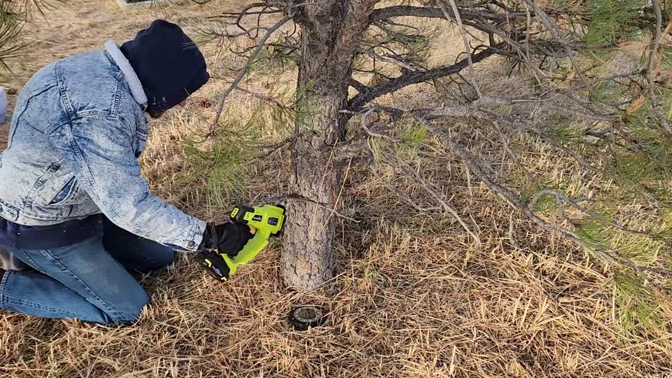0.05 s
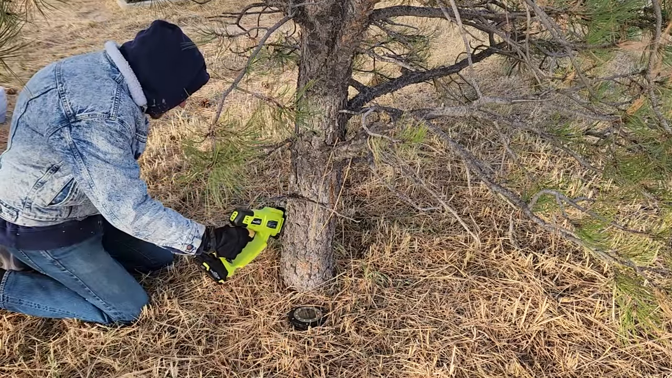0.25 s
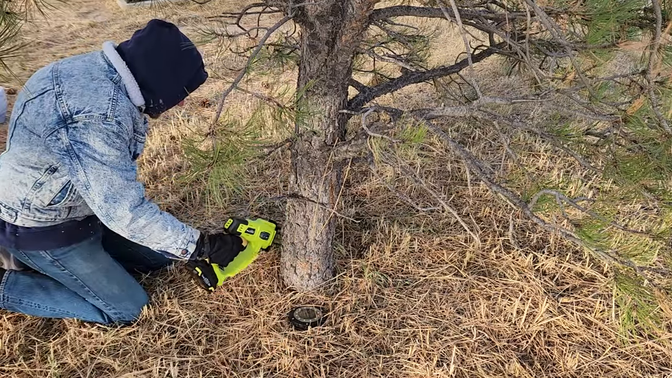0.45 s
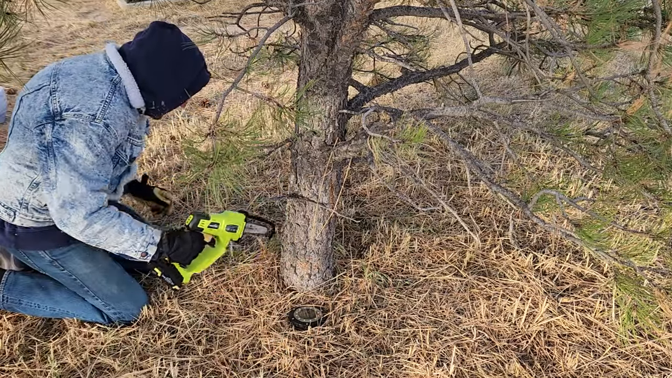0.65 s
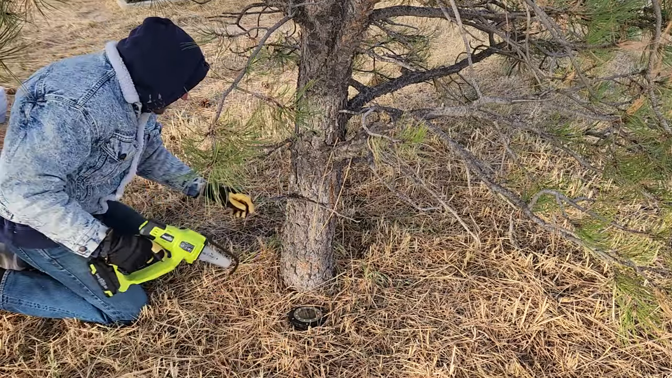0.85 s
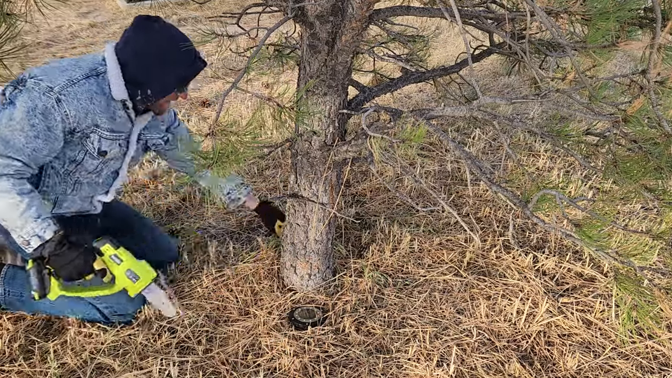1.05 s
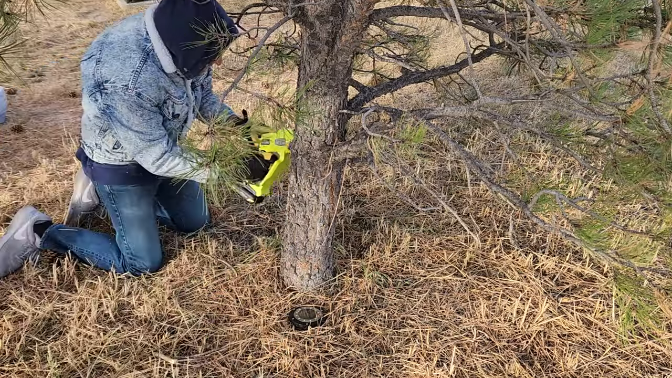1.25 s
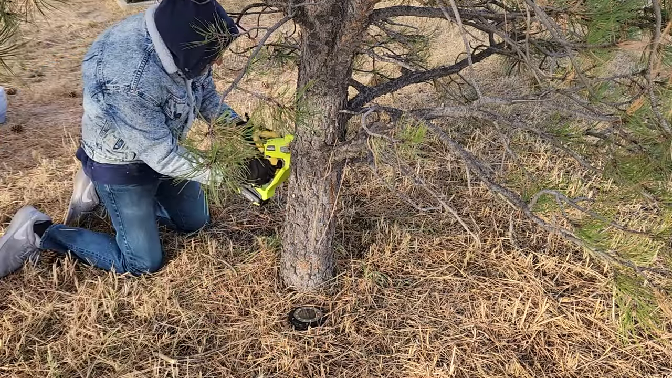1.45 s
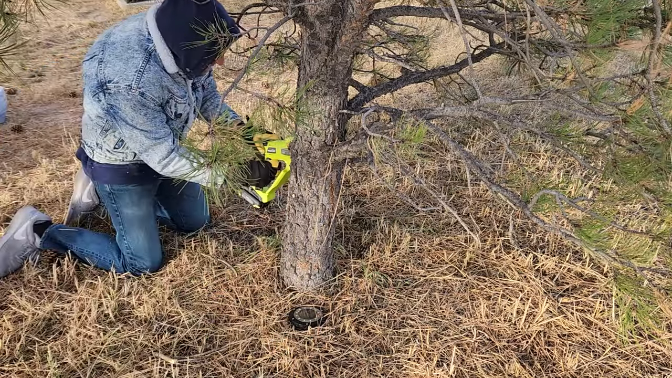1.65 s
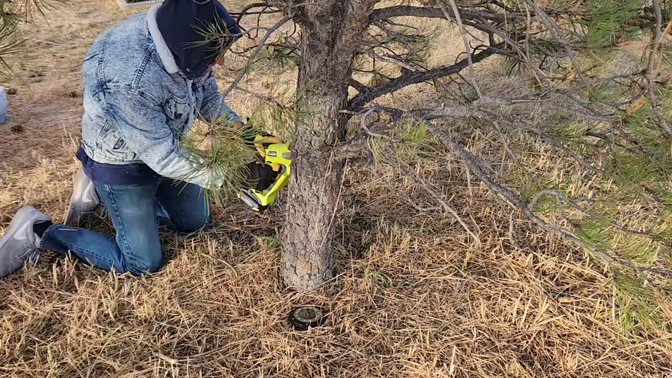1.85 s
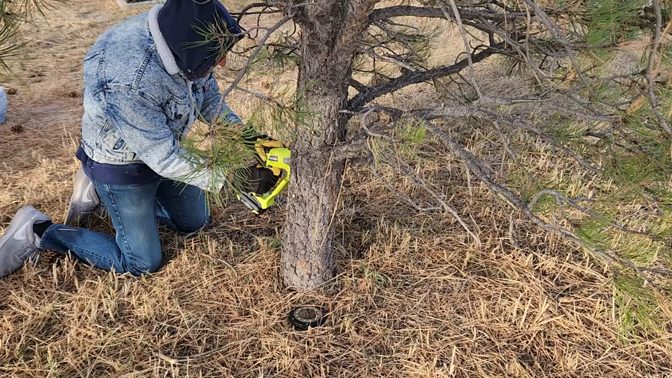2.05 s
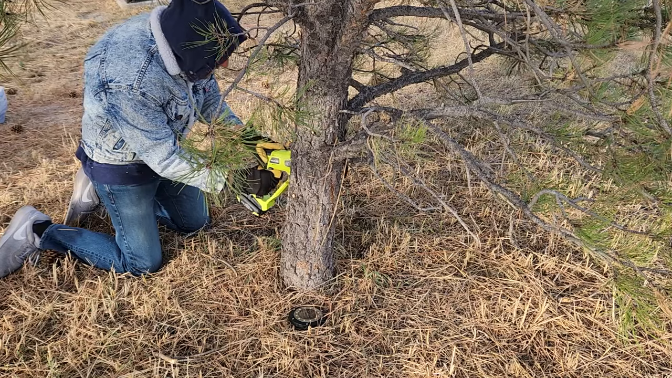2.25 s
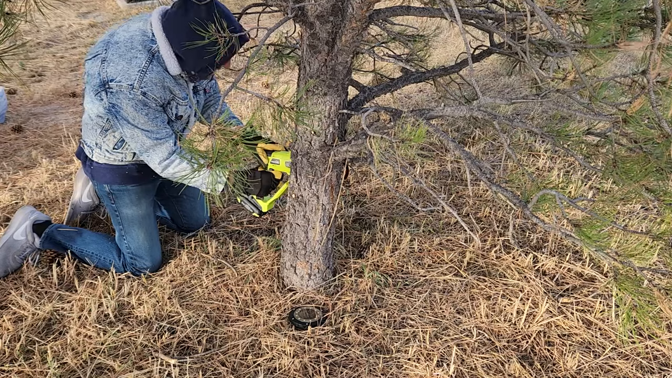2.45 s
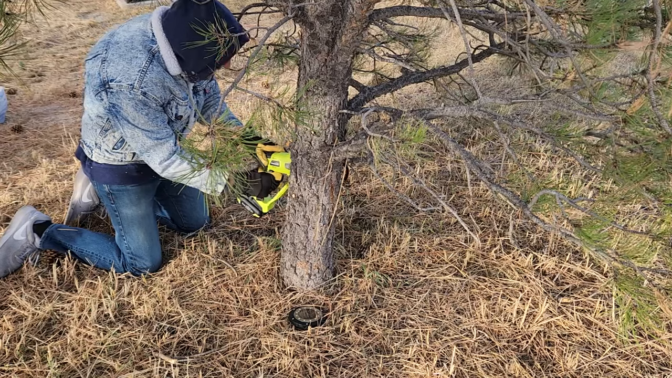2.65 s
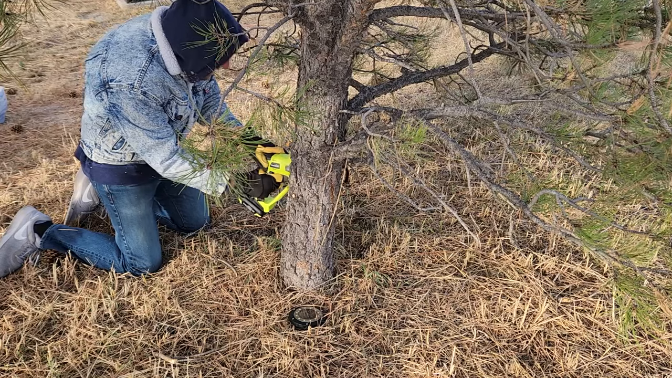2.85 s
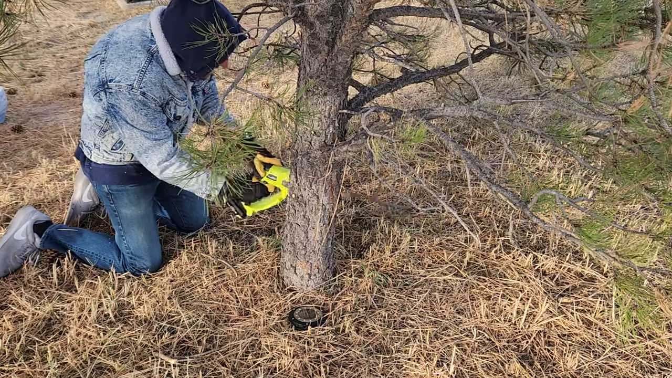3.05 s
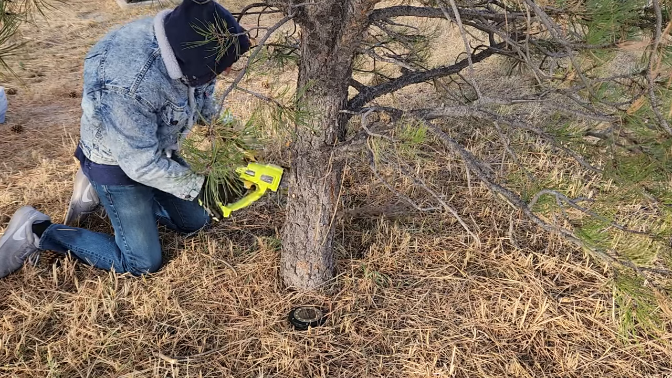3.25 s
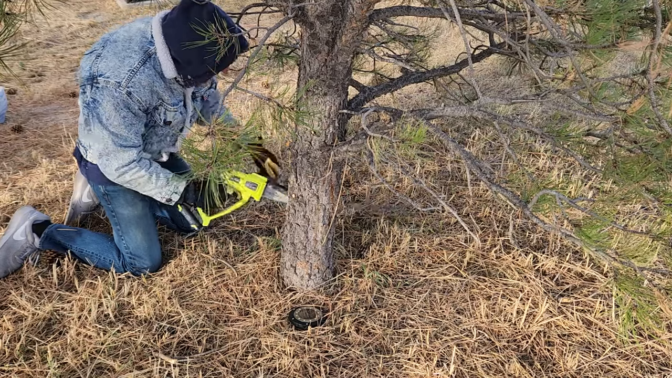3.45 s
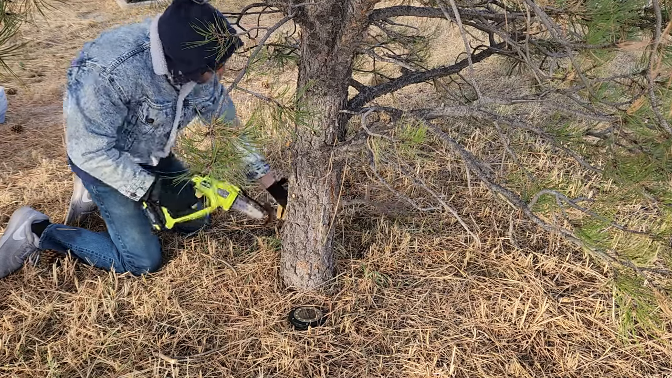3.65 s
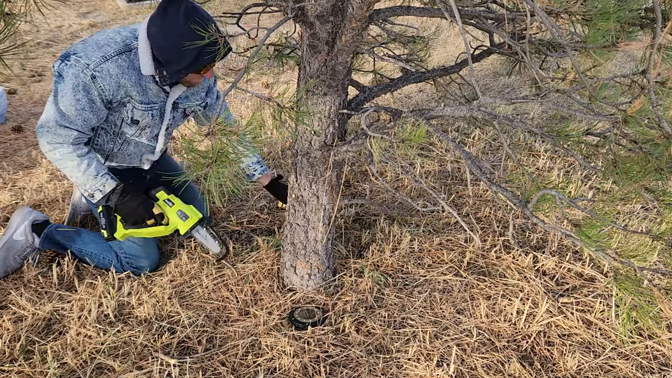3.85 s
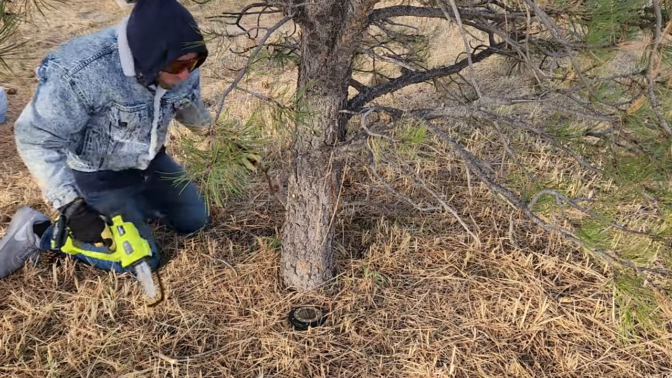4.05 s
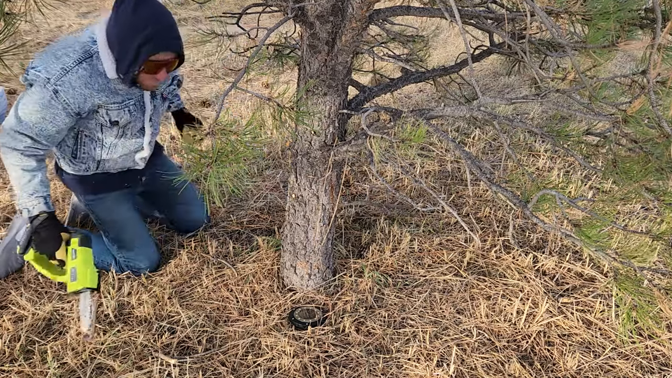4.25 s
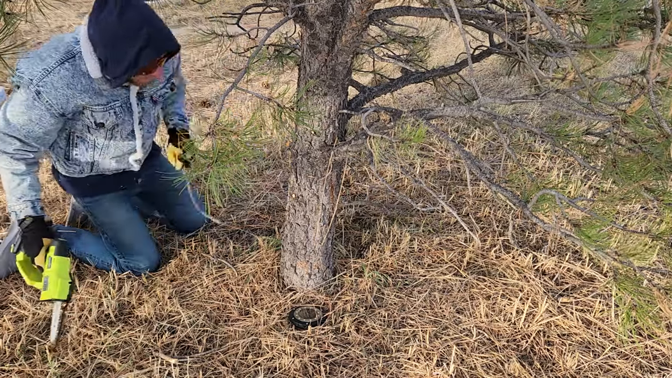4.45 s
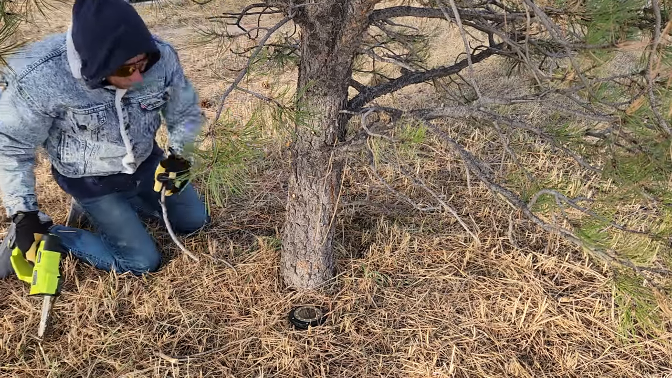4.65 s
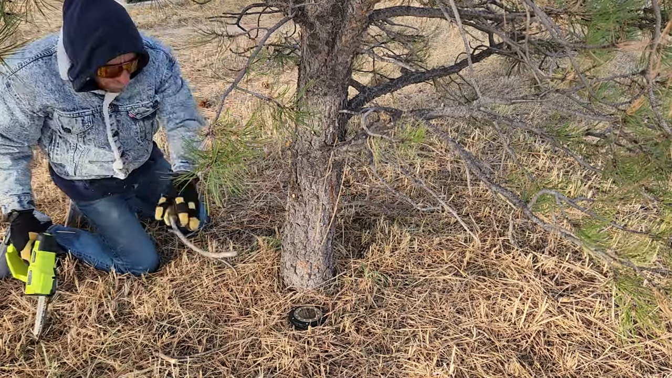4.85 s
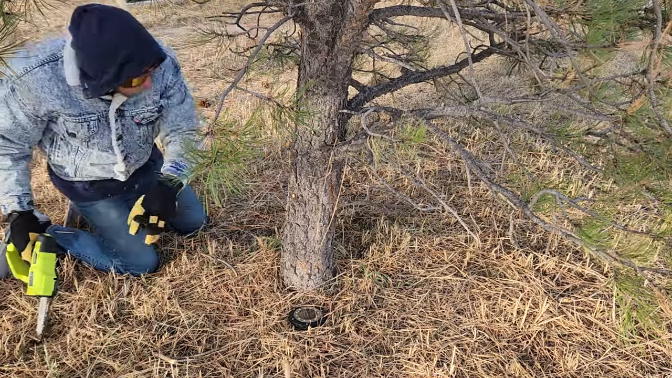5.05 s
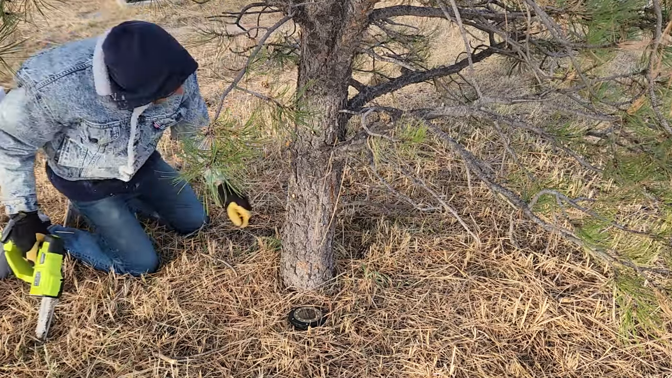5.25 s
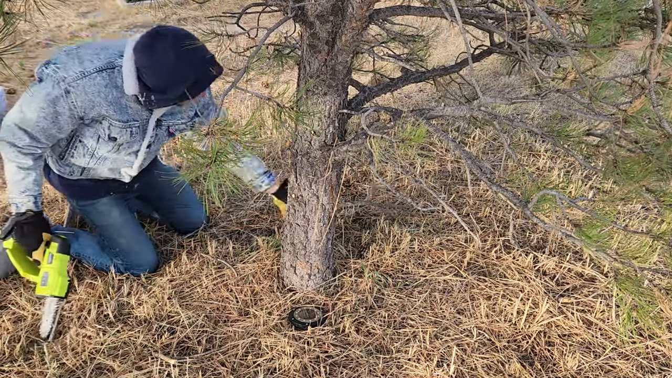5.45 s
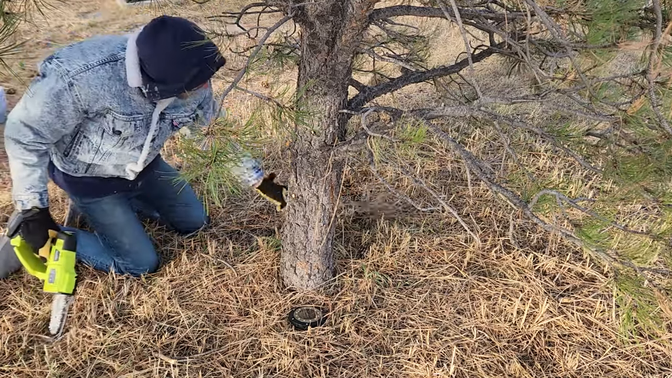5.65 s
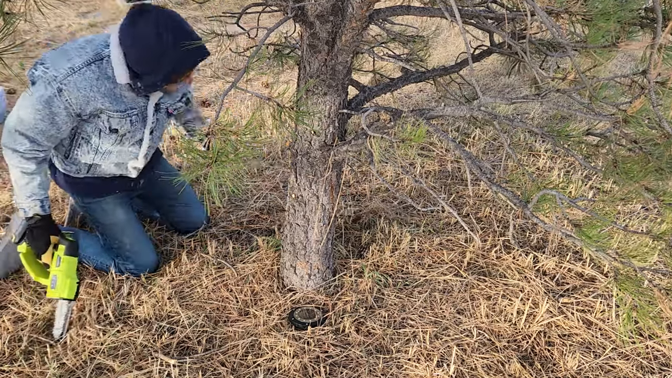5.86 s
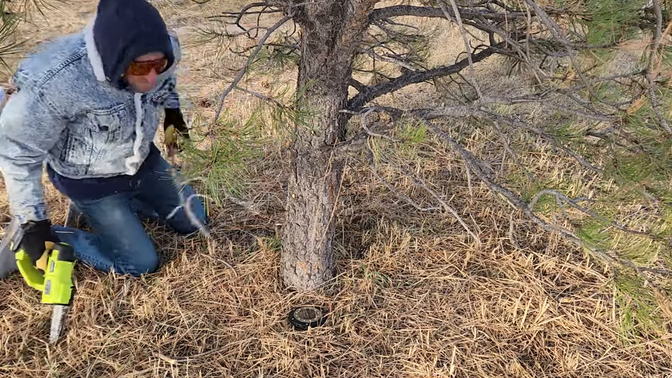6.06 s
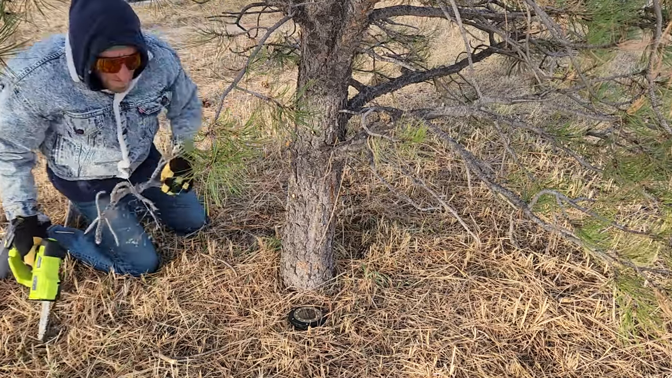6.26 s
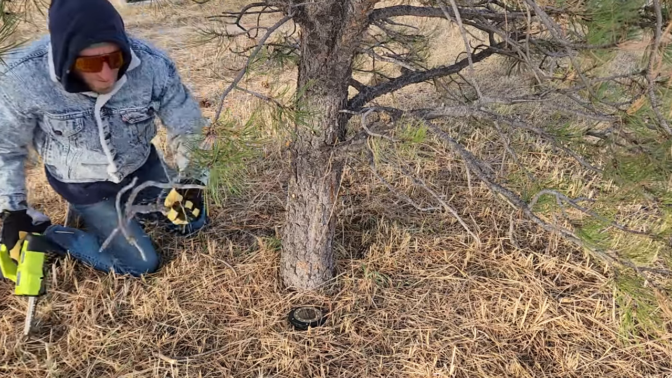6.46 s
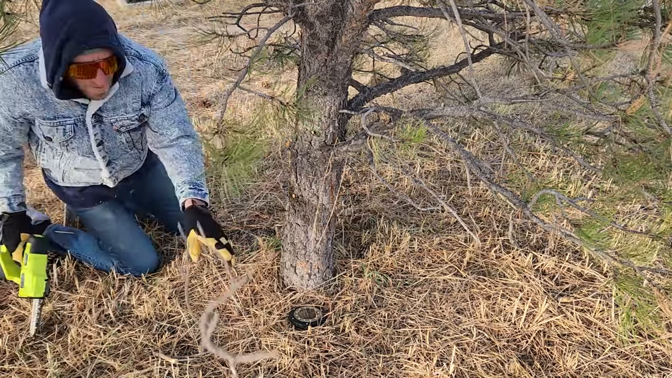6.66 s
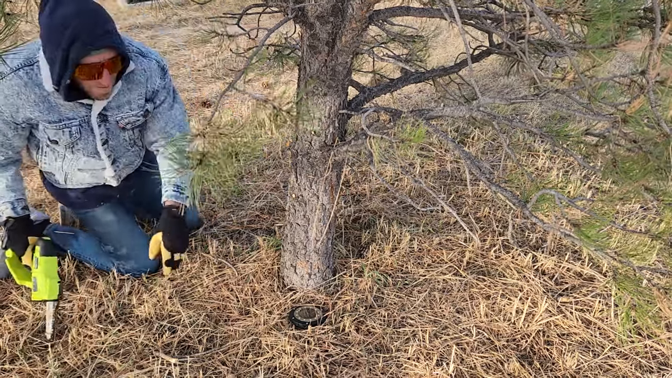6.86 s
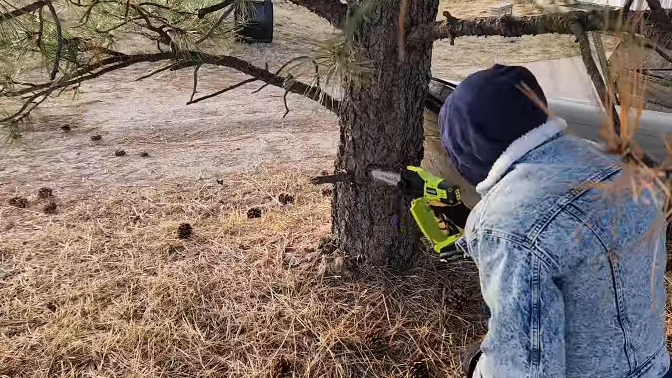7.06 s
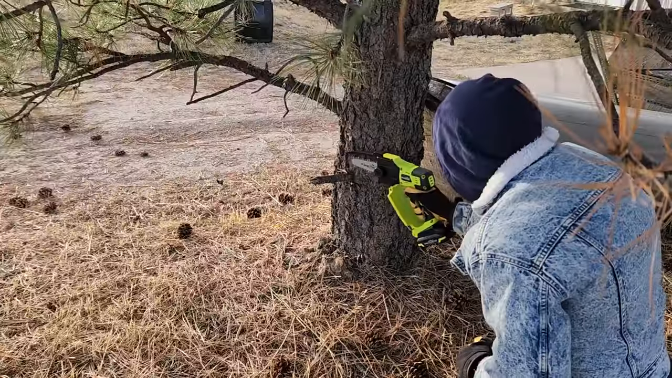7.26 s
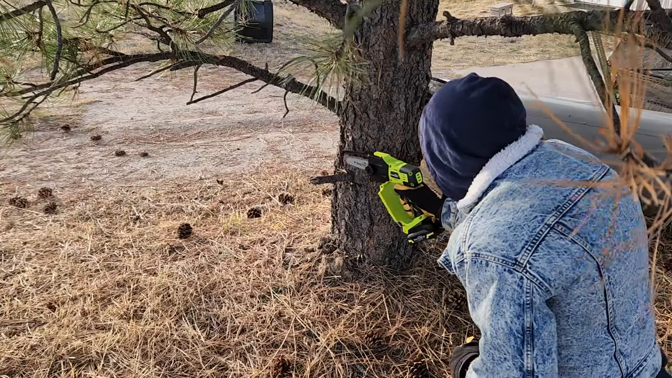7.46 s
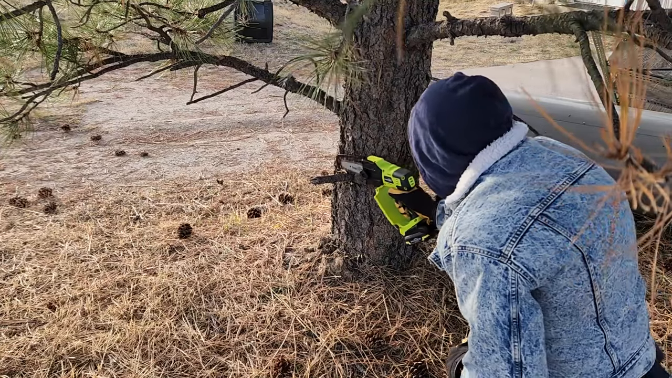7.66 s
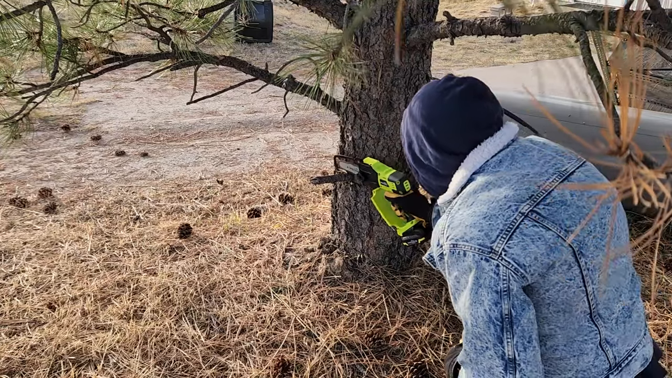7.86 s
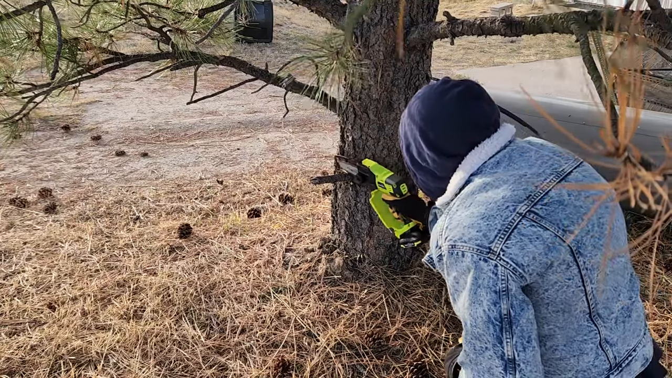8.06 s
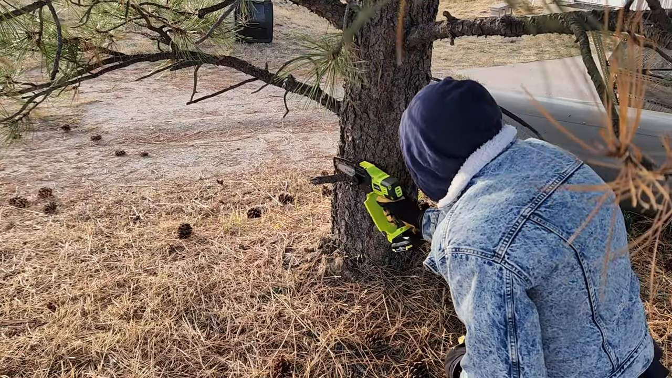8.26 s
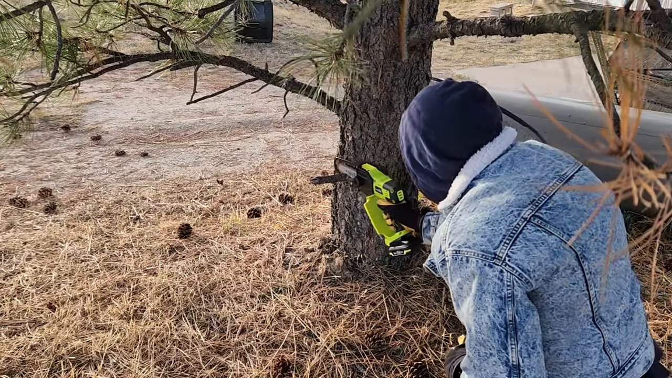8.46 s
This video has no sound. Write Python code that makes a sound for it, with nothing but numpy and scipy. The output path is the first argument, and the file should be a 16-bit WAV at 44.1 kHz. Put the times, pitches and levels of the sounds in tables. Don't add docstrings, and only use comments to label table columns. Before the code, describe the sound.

A small electric chainsaw buzzes through a thin branch, coasts down, cuts a thicker one, then after quiet rustling and twig snaps restarts closer.

```python
import sys
import numpy as np
from scipy import signal
from scipy.fft import rfft, irfft
from scipy.io import wavfile
from scipy.ndimage import uniform_filter1d

SR = 44100
rng = np.random.default_rng(int(sys.argv[2]) if len(sys.argv) > 2 else 0)


def waveform_to_disk(signal):
    frames = np.transpose(np.atleast_2d(signal))
    scaled = np.clip(frames, -1, 1) * 32767
    samples = np.round(scaled).astype(np.int16)
    wavfile.write(sys.argv[1], SR, samples)


def convert_level_to_amplitude(level_db):
    exponent = np.asarray(level_db, float) / 20
    return 10 ** exponent


N = 375290
TIME = np.arange(N) / SR
PADDED = N + 510
FREQS = np.fft.rfftfreq(PADDED, 1 / SR)

# likeness [f/Hz, 0-1], balance [f/Hz, level/dB], lead of the left [t/s]
PORTS_FAR = ([(60, .97), (400, .95), (1400, .88), (2500, .65), (5000, .6), (9000, .55), (15000, .5)],
              [(60, 0.0), (150, 0.0), (380, 1.0), (950, 3.5), (2380, 3.5), (5980, 5.5), (15000, 3.5)],
              9.5e-5)
PORTS_NEAR = ([(60, .9), (400, .92), (2500, 0.89), (5000, 0.7), (9000, 0.41), (15000, 0.35)], [(60, -5),
               (150, 6.5), (380, -1.5), (950, 3.5), (2380, 3), (5980, 5.5), (15000, 2)], 1.5e-5)
PORTS_AIR = ([(60, 1), (180, 0.98), (550, 0.32), (1650, 0.14), (4970, 0.094), (15000, 0.1)], [(60, 1.0),
              (240, 0.5), (950, 2.1), (3770, 5.3), (15000, 5.5)], 5e-5)
# [t/s, chips torn out level/dB, sag of the motor f/Hz]
CUTS = [
    [(0.0, -29, 34.03), (.1, -30, 34), (.15, -28, 34), (.27, -27.5, 34.3), (.285, -36.5, 34.2),
     (.3, -28, 33.7), (.345, -31, 34.15), (0.385, -29, 33.9)],
    [(2.3, -47, 5.9), (2.55, -35, 14.2), (2.66, -32, 55), (2.912, -30, 55), (2.945, -34.5, 54)],
    [(8.125, -54, 4.75), (8.141, -29.5, 19.6), (8.25, -25.5, 33.4), (8.43, -25.5, 28), (8.442, -35.5, 28),
     (8.46, -27.5, 27), (8.51, -27.5, 30)],
]
# [f/Hz, level/dB per Hz]
HISS_FAR = [(2350, -30.5), (4000, 1), (4960, 1.5), (5540, 1), (6000, -2.5), (7270, 1.5), (8550, -4.5),
            (9770, -7), (10800, -5), (12800, -2), (13800, -6.5), (15100, -7)]
WOOD = [(120, -50.5), (200, -13), (458, -13.5), (787, 1), (999, -7), (1920, -1), (2560, -7), (4060, -1),
        (7430, -14), (9000, -41.5), (11700, -50), (19800, -120)]
WOOD_NEAR = [(88, -34.5), (150, -8.5), (301, -13), (382, -10.5), (551, -12), (615, -9), (1090, -4),
             (1460, -14), (2180, -8.5), (3920, -8), (8020, -14.5), (8950, -15.5), (12000, -8.5),
             (15600, -41), (22000, -120)]
SNAP = [(180, -43), (300, -10), (1750, -5.5), (2250, -7), (2440, -3.5), (4300, -6), (6100, -5.5),
        (6740, -17), (7440, -9), (9240, -25), (12700, -18.5)]
BRIGHT_RUB = [(710, -47), (1200, -17), (1960, -13), (2260, -16), (2480, -7), (2770, -11), (3390, -6),
              (7170, -0.5), (15500, -6.5)]


def chainsaw():
    # [pulled t/s, let go t/s, free-running turns f/Hz, driven orders level/dB, gear mesh level/dB]
    trigger = [
        (-1, .51, 353, -48, -43.5),
        (1.5, 3.105, 354.5, -47, -64),
        (7.415, 9, 356.8, -52, -46),
    ]
    # [t/s, hiss level/dB, housing rattle over hiss level/dB]
    burst_1 = [
        (0.0, -35, 3),
        (0.37, -33, 3.5),
        (0.424, -38, 3),
        (0.67, -35.5, -2.5),
        (1.06, -43, 6.5),
        (1.165, -49.5, 10.5),
        (1.193, -53, 10),
    ]
    burst_2 = [
        (1.51, -60.5, 3),
        (1.52, -50, 15),
        (1.58, -41.5, 3.5),
        (2.19, -42, 3.8),
        (2.89, -35.5, 2.25),
        (2.97, -40.5, 0.98),
        (3.57, -43, 4.7),
        (3.95, -55.5, 15.8),
        (4.07, -78, 24),
    ]
    burst_3 = [
        (7.425, -42.5, 7.5),
        (7.515, -32.5, -3),
        (8.101, -32, -3.5),
        (8.169, -27.5, -2.5),
        (8.459, -30, -1),
        (8.51, -25, -2),
    ]
    # [multiple of the turns, level/dB]
    orders_far = [(1, -21), (1.75, -16.5), (2, -17), (3, -7.5), (4, -4.5), (5, -10.5), (6, -16.5),
                  (7, -14.5), (36, -16.5)]
    orders_near = [(1, -8.5), (2, -9), (3, -10.5), (4, -5.5), (5, -8), (7, -10), (13, -2), (36, -8.5)]
    # [f/Hz, level/dB per Hz]
    rattle_far = [(180, -62), (300, -13), (353, -16), (521, -17.5), (607, -11), (877, -10.5), (1050, -4.5),
                  (1210, -4.5), (1440, -2), (1570, -6.5), (4000, -7.5), (5200, -40.5), (8800, -120)]
    rattle_near = [(180, -70), (300, -33), (353, -14), (434, -19.5), (669, -12), (699, -6), (813, -14),
                   (1440, -5), (1700, -9.5), (2110, -0.5), (4000, -7.5), (5200, -40), (8800, -120)]
    hiss_near = [(2350, -38.5), (4000, -10), (4570, 2), (4900, -3.5), (5760, -4.5), (6400, -5),
                 (6940, -7.5), (7530, 1.5), (7930, -1.5), (9490, -8), (12500, 0), (15100, -6)]
    far = rattle_far, HISS_FAR, orders_far, PORTS_FAR
    near = rattle_near, hiss_near, orders_near, PORTS_NEAR
    running = saw(trigger[0], burst_1, *far, steady=1.4, spread_db=4.0, wobble=0.11,
                  surge_db=-58.5, gear_db=-5.5)
    running += saw(trigger[1], burst_2, *far, steady=1.6, spread_db=3.5, wobble=0.09,
                   surge_db=-44.5, gear_db=-12)
    running += saw(trigger[2], burst_3, *near, steady=1.5, spread_db=5.5, wobble=0.22,
                   surge_db=-50, gear_db=-10.5)
    return running


def saw(trigger, burst, rattle, hiss, orders, pair, steady, spread_db, wobble, surge_db, gear_db):
    turns_hz, driven_db, coast_db, mesh_db = motor(*trigger)
    (hiss_db, rattle_db), on = in_time(burst)
    turns = np.cumsum(turns_hz * (1 + .0012 * drift(30))) / SR
    pace = np.clip(turns_hz / 330, 0, 1)

    cutters_per_turn, turns_per_sprocket = .4, 6.9
    passing = np.diff(np.floor(cutters_per_turn * turns + .12 * drift(60)), prepend=0) > 0
    knocks = dying(passing * convert_level_to_amplitude(spread_db * np.clip(rng.standard_normal(N), -1.5, 1.5)), 0.006)
    knocks /= np.sqrt(uniform_filter1d(knocks ** 2, SR // 8) + 1e-6)
    out_of_true = 1 + wobble * np.cos(2 * np.pi * turns / turns_per_sprocket)
    gate = (steady + knocks * pace ** 0.55) * out_of_true
    gate /= np.sqrt(uniform_filter1d(gate ** 2, SR // 8))
    chain = dulled(noise(hiss, gate, pair), 9000, pace ** 0.38)
    chain += convert_level_to_amplitude(rattle_db - 3.0) * dulled(noise(rattle, gate, pair), 910, pace ** 0.97)

    levels = [(5, coast_db), (7, coast_db - 7), (18, mesh_db)]
    levels += [(k, driven_db + db + 1) for k, db in orders]
    phase = rng.random(40)
    whine = np.zeros(N)
    for k, db in levels:
        whine += convert_level_to_amplitude(db + 3.5 + 2.5 * drift(25)) * np.sin(2 * np.pi * (k * turns + phase[int(k)]))

    since = np.maximum(TIME - trigger[0], 0)
    housing_hz, housing_width_hz, surge_db_per_s = 1250, 380, 60
    for k in (4, 5, 6, 7):
        flare_db = surge_db - surge_db_per_s * since - 30 * np.exp(-since / .012) + 2.5 * drift(60)
        flare_db -= 9 * ((k * turns_hz - housing_hz) / housing_width_hz) ** 2
        whine += convert_level_to_amplitude(flare_db) * np.sin(2 * np.pi * (k * turns + phase[k]))

    gear_order, gear_width_hz = 36.5, 1000
    low = signal.butter(2, gear_width_hz, fs=SR, output="sos")
    rough = rms_one(signal.sosfilt(low, rng.standard_normal((2, N))))
    gears = rough * convert_level_to_amplitude(gear_db) * pace ** 2 * gate * np.sin(2 * np.pi * gear_order * turns)
    chain += ports(*rfft(gears, PADDED), *pair)
    return on * convert_level_to_amplitude(hiss_db) * chain + from_point(whine * on, (*pair[:2], 2e-5))


def motor(pulled, let_go, free_hz, driven_db, mesh_db):
    spin_up_gap_hz, spin_up_s = 260, .055
    sag = sum(on * hz for (_, hz), on in map(in_time, CUTS))
    r = np.exp(-1 / (spin_up_s * SR))
    sag = signal.lfilter([1 - r], [1, -r], sag, zi=[r * CUTS[0][0][-1]])[0]
    driven = free_hz - sag - spin_up_gap_hz * np.exp(-np.maximum(TIME - pulled, 0) / spin_up_s)

    friction_hz_per_s, drag_per_s, let_go_s = 285, .7, .02
    rest = friction_hz_per_s / drag_per_s
    after = np.maximum(TIME - let_go, 0)
    after -= let_go_s * (1 - np.exp(-after / let_go_s))
    last = np.interp(let_go, TIME, driven)
    slowing = np.maximum((last + rest) * np.exp(-drag_per_s * after) - rest, 10)
    hz = np.where(after > 0, slowing, driven)

    coast = -47.5 + 22 * np.log10(hz / 300) - np.maximum(112 - hz, 0)
    coast -= 60 * (after <= 0) + 18 * np.clip(1 - after / .08, 0, 1)
    driven_level = driven_db - 0.06 * (free_hz - driven) - 200 * after
    return hz, driven_level, coast, mesh_db - 0.27 * (free_hz - hz)


def bites():
    # [t/s, peak level/dB, ring f/Hz]
    far = [(0.021, -15, 805), (.0225, -17.5, 4100), (0.063, -17.5, 820), (0.085, -16, 2040),
           (.045, -20, 790), (.075, -21, 790), (.108, -20, 4040), (0.113, -18, 810), (.136, -21.5, 4100),
           (.144, -19.5, 1930), (0.147, -16, 780), (.151, -18, 1290), (0.168, -15.5, 826),
           (0.195, -16, 2210), (.205, -17.5, 900), (0.212, -15.5, 2030), (.226, -18.5, 1710),
           (0.265, -16.5, 1930), (.272, -15, 737), (.301, -19, 3820), (.333, -18, 1800),
           (0.295, -19.5, 2030), (0.308, -18, 1920), (.316, -19.5, 1750), (0.323, -14.5, 1880),
           (0.353, -11, 1740), (0.366, -18, 724), (0.387, -12.5, 4210), (2.285, -21, 2160),
           (2.374, -31.5, 1410), (2.433, -26, 1393), (2.454, -18.5, 1156), (2.51, -28.5, 1250),
           (2.563, -22, 705), (2.621, -19.5, 1400), (2.688, -19.5, 1070), (2.798, -22.5, 1100),
           (2.863, -19, 784), (2.537, -24.5, 1010), (2.553, -21, 635), (2.598, -21.5, 920),
           (2.639, -20.5, 1100), (2.678, -20, 1283), (2.711, -19, 867), (2.738, -19.5, 770),
           (2.75, -19, 1150), (2.782, -29, 2100), (2.828, -21, 1150), (2.854, -17.5, 1384),
           (2.904, -16.5, 1082), (2.935, -18.5, 806)]
    near = [(8.112, -30, 4530), (8.142, -21.5, 2390), (8.172, -14, 1129), (8.196, -12.5, 1110),
            (8.227, -15, 1129), (8.308, -15.5, 3413), (8.335, -13.5, 2000), (8.377, -15, 2215),
            (8.4, -14, 2670), (8.425, -15.5, 2800), (8.464, -16, 2160)]
    cutting = cracks(far, WOOD, PORTS_FAR, tau_s=0.0035, ring_s=0.0053,
                     noise_db=-11.0, ring_db=-9.5, tail_db=-19.5, tick_db=-4.5)
    return cutting + cracks(near, WOOD_NEAR, PORTS_NEAR, tau_s=0.0014, ring_s=0.0083,
                            noise_db=-8, ring_db=-14.0, tail_db=-24.0, tick_db=-9.5)


def rasp():
    # [f/Hz, width f/Hz, level/dB]
    modes = [
        [(800, 39, -2.5), (1280, 60, -7.5), (1880, 70, -4), (2030, 50, -0.5)],
        [(764, 69, -1.5), (1150, 52, -1), (1400, 60, -2.5), (2100, 88, -3)],
        [(1120, 38, -0.5), (2180, 90, -3), (2750, 91, -5), (3293, 100, -5)],
    ]
    # [f/Hz, level/dB per Hz]
    wood_thick = [(71, -39.5), (120, -10), (388, -13.5), (433, -11.5), (500, -4.5), (1170, -3),
                  (2320, -8.5), (7510, -11.5), (9000, -22.5), (11700, -51), (19800, -120)]
    chips = grainy(600, clump_db=2.5, size_db=3.0, tau_s=.002, smooth=1.2)
    first, second, near = [chips * on * convert_level_to_amplitude(db) for (db, _), on in map(in_time, CUTS)]
    torn = noise(WOOD, first, PORTS_FAR)
    torn += noise(wood_thick, second, PORTS_FAR)
    torn += noise(WOOD_NEAR, near, PORTS_NEAR)
    ringing = convert_level_to_amplitude(-11.5) * noise(resonant(modes[0]), first, PORTS_FAR)
    ringing += convert_level_to_amplitude(-12.5) * noise(resonant(modes[1]), second, PORTS_FAR)
    ringing += convert_level_to_amplitude(-13.5) * noise(resonant(modes[2]), near, PORTS_NEAR)
    return ringing + convert_level_to_amplitude(-6.0) * torn


def loose_chain():
    # [t/s, peak level/dB, ring f/Hz]
    starts = [
        (1.504, -24.5, 2360),
        (7.419, -32, 2930),
    ]
    links = [(0.5554, -36, 6000), (0.5754, -30, 5800), (0.717, -27, 5350), (0.7795, -29, 9030),
             (0.8774, -32, 8650), (0.9244, -31, 7450), (1.1059, -45, 4350), (1.1448, -35, 7620),
             (1.157, -40, 4630)]
    slaps = [(3.43, -35, 1238), (3.555, -38, 1096), (3.61, -35, 1296), (3.795, -40, 727), (.645, -36, 1101),
             (.918, -30, 1180), (1.075, -34.5, 812), (1.53, -32, 1291), (3.505, -32, 1111),
             (3.655, -32, 1162), (7.45, -33, 2596), (7.468, -32, 2600), (7.485, -28, 2630),
             (7.53, -36, 2492)]
    sound = cracks(starts, SNAP, PORTS_FAR, tau_s=.0025, ring_s=.002,
                   noise_db=1, ring_db=-3, tail_db=-21, tick_db=-6)
    sound += cracks(links, HISS_FAR, PORTS_FAR, tau_s=.003, ring_s=0.0036,
                    noise_db=-6, ring_db=-3, tail_db=-34, tick_db=-30)
    return sound + cracks(slaps, WOOD, PORTS_FAR, tau_s=0.0054, ring_s=0.006,
                          noise_db=-15.0, ring_db=-3, tail_db=-18.5, tick_db=-20)


def twigs():
    # [t/s, peak level/dB, ring f/Hz]
    snaps = [(5.132, -45, 7000), (5.1358, -36, 1760), (5.1425, -36.5, 7160), (5.1524, -41, 2420),
             (5.2378, -37.5, 1880), (5.4258, -53, 12300), (5.5673, -50.5, 3170), (6.4577, -67, 5510),
             (6.785, -36.5, 7600), (6.804, -30.5, 6150), (6.8363, -48, 2850), (6.8447, -46, 1260),
             (6.8703, -44.5, 4350), (6.8982, -41, 6200), (6.914, -49, 1240), (6.9523, -51.5, 2040),
             (7.1235, -52, 1460), (7.1907, -54.5, 1080), (7.2504, -52, 5550), (7.3632, -48.5, 1068)]
    ticks = [(4.999, -56, 6130), (5.0194, -60, 6380), (5.267, -43, 5250), (5.2944, -58, 3460),
             (5.3444, -64, 3690), (5.3582, -60, 3790), (5.3847, -62, 6220), (5.4455, -55, 7250),
             (6.7486, -53, 7490), (6.887, -40, 6220), (6.9745, -54, 8870), (7.0214, -56, 7230),
             (7.0324, -52, 7080), (7.0424, -42, 6540), (7.0554, -46, 7350), (7.0768, -55, 7450),
             (7.097, -50, 7280), (7.1235, -44, 8020), (7.304, -53, 7660), (7.3357, -49, 5160)]
    thin = [event for event in snaps if event[2] > 2000]
    thick = [event for event in snaps if event[2] <= 2000]
    sound = cracks(thin, SNAP, PORTS_FAR, tau_s=0.0021, ring_s=0.0013,
                   noise_db=-7.5, ring_db=6, tail_db=-11.5, tick_db=-7)
    sound += cracks(thick, WOOD, PORTS_FAR, tau_s=0.0035, ring_s=0.0032,
                    noise_db=-10.5, ring_db=-2.5, tail_db=-10, tick_db=-12)
    return sound + cracks(ticks, BRIGHT_RUB, PORTS_FAR, tau_s=0.00096, ring_s=0.0011,
                          noise_db=-8.5, ring_db=3.5, tail_db=-28, tick_db=-30)


def rustle():
    # [loudest t/s, level/dB, swell t/s, fade t/s]
    movements = [(4.08, -74.5, .1, .3), (4.4, -78, 0.087, .06), (4.28, -71, 0.18, 0.3),
                 (4.8, -71.5, 0.11, 0.62), (4.94, -67.5, 0.38, 0.11), (5.255, -64, 0.035, 0.11),
                 (5.43, -66.5, 0.017, 1), (6.0, -79, .6, 0.23), (6.33, -78.5, 0.061, 0.34),
                 (6.46, -65, 0.015, .3), (6.52, -62, 0.17, 0.037), (6.74, -65, 0.11, 0.066),
                 (6.805, -41, 0.024, 0.024), (6.83, -55.5, .02, 0.35), (7.05, -63.5, 0.15, 0.35),
                 (7.3, -64, 0.28, 0.58)]
    sweeps = [
        (5.68, -62, 0.062, 0.12),
        (5.75, -54, 0.11, 0.08),
    ]
    # [f/Hz, level/dB per Hz]
    cloth = [(1180, -37), (2000, -7), (2280, -15), (2490, -12), (2760, -7.5), (3400, -4), (4150, -4),
             (4770, 0), (7190, 2.5), (8850, -8), (11300, -8.5), (15200, -3.5)]
    # [start t/s, end t/s]
    span = (4.75, 7.42)
    moving = swells(movements) + convert_level_to_amplitude(-85.5) * (np.digitize(TIME, span) == 1)
    moving *= TIME < span[1]
    grains = grainy(400, clump_db=3.5, size_db=2.0, tau_s=0.0011, smooth=1.23)
    return noise(cloth, moving * grains, PORTS_FAR) + noise(BRIGHT_RUB, swells(sweeps) * grains, PORTS_FAR)


def wind():
    # [t/s, level/dB]
    strength = [
        (0.0, -53),
        (1.32, -56),
        (1.73, -55),
        (2.13, -59.5),
        (2.65, -54.5),
        (7.09, -55.5),
        (7.27, -41.5),
        (7.7, -53.5),
        (7.99, -53),
        (8.51, -36),
    ]
    # [f/Hz, level/dB per Hz]
    gust = [(12, -33), (20, -5.5), (43, -5), (70, -1.5), (157, -9), (220, -38), (250, -20.5), (320, -53),
            (550, -120)]
    # [t/s, peak level/dB, f/Hz, left over right level/dB]
    buffets = [(0.298, -42, 68.4, 2.5), (6.233, -42, 59.5, 8), (6.463, -40, 38.9, 5), (6.511, -41, 37.6, 8),
               (7.104, -25.5, 88.6, -6), (7.119, -29.5, 55.7, -13), (7.141, -25.5, 52.6, 2),
               (7.163, -28, 65.6, -16), (7.22, -28, 72, -3), (7.254, -32, 80.5, -13), (7.279, -25, 51, -7),
               (7.367, -23, 73.96, 4.5), (7.541, -23.5, 46.7, -2), (7.309, -30, 60.7, -3),
               (7.91, -32, 40, -6), (7.939, -31, 43.38, 4), (8.25, -32, 82, -7), (8.375, -27, 59.2, 6),
               (8.397, -25, 58.2, 6), (8.429, -28, 60.6, 5)]
    (db,), _ = in_time(strength)
    thumps, t = np.zeros((2, N + 8000)), np.arange(8000) / SR
    for s, peak_db, hz, pan_db in buffets:
        at = round(s * SR)
        hump = np.exp(-((t * hz - .8) / .5) ** 2)
        wave = np.sin(2 * np.pi * hz * t + 0.1 * np.sin(4 * np.pi * hz * t))
        sides = convert_level_to_amplitude([[peak_db + pan_db / 2], [peak_db - pan_db / 2]])
        thumps[:, at:at + len(t)] += sides * (hump * wave)
    return convert_level_to_amplitude(db) * noise(gust, rms_one(convert_level_to_amplitude(3.0 * drift(13))), PORTS_AIR) + thumps[:, :N]


def hum():
    # [f/Hz, level/dB per Hz]
    traffic = [(88, -31.5), (150, -17.5), (346, -18.5), (395, -16), (492, -24), (579, -21), (660, -26),
               (1190, -33.5), (5000, -58.5), (8000, -64), (11000, -120)]
    thrum = swells([(2.8, -51, 0.21, 0.23)])
    return noise(traffic, convert_level_to_amplitude(-66.5) + thrum, PORTS_AIR)


def cracks(events, spectrum, pair, tau_s, ring_s, noise_db, ring_db, tail_db, tick_db):
    clicks, rings, t = np.zeros(N), np.zeros(N + 4000), np.arange(4000) / SR
    tick = np.exp(-t / .0004) * np.sin(2 * np.pi * 3500 * t)
    for s, db, hz in events:
        at = round(s * SR)
        clicks[at] = convert_level_to_amplitude(db + noise_db)
        ring = np.exp(-t / ring_s) * np.sin(2 * np.pi * hz * t)
        rings[at:at + len(t)] += convert_level_to_amplitude(db + ring_db) * ring + convert_level_to_amplitude(db + tick_db) * tick
    puffs = dying(clicks, tau_s) + convert_level_to_amplitude(tail_db) * dying(clicks, 0.017)
    return noise(spectrum, puffs, pair) + from_point(rings[:N], pair)


def noise(spectrum, gate, pair):
    white = rfft(rng.standard_normal((2, N)) * gate, PADDED)
    colour = rms_one(convert_level_to_amplitude(at_hz(spectrum)))
    return ports(*(white * colour), *pair)


def from_point(sound, pair):
    heard = rfft(sound, PADDED)
    return ports(heard, 0 * heard, *pair)


def ports(mid, side, likeness, balance, lead_s):
    alike = np.clip(at_hz(likeness), 0, 1)
    tilt = convert_level_to_amplitude(at_hz(balance) / 2) * np.exp(1j * np.pi * lead_s * FREQS)
    mid, side = np.sqrt(1 + alike) * mid, np.sqrt(1 - alike) * side
    return irfft([(mid + side) * tilt, (mid - side) / tilt])[:, :N] / np.sqrt(2)


def grainy(per_s, clump_db, size_db, tau_s, smooth):
    struck = rng.random(N) < per_s * convert_level_to_amplitude(clump_db * drift(20)) / SR
    sizes = convert_level_to_amplitude(size_db * np.minimum(rng.exponential(1, N), 4))
    return rms_one(smooth + dying(struck * sizes, tau_s))


def dying(clicks, tau_s):
    fall, rise = np.exp(-1 / (tau_s * SR)), np.exp(-8 / (tau_s * SR))
    both = np.convolve([1, -fall], [1, -rise])
    return signal.lfilter([1.35 * (1 - rise)], both, clicks + 1e-18)


def drift(rate):
    knots = rng.standard_normal(int(N / SR * 400))
    r = np.exp(-2 * np.pi * rate / 400)
    slow = rms_one(signal.lfilter([1], [1, -2 * r, r * r], knots))
    return np.interp(TIME * 400, np.arange(len(slow)), slow)


def swells(rows):
    return sum(convert_level_to_amplitude(db - 20 * np.maximum((s - TIME) / rise, (TIME - s) / fall)) for s, db, rise, fall in rows)


def in_time(rows):
    s, *columns = np.transpose(rows)
    on = np.interp(TIME, [s[0] - .004, s[0], s[-1], s[-1] + .004], [0, 1, 1, 0])
    return [np.interp(TIME, s, c) for c in columns], on


def at_hz(points):
    hz, value = np.transpose(points)
    return np.interp(np.log(FREQS + 1), np.log(hz), value)


def resonant(modes):
    hz = np.geomspace(300, 6000, num=600)
    power = sum(convert_level_to_amplitude(db) ** 2 / (1 + (2 * (hz - f) / width) ** 2) ** 2 for f, width, db in modes)
    return np.transpose([hz, 10 * np.log10(power + 1e-12)])


def dulled(x, cut_hz, share):
    low = signal.sosfiltfilt(signal.butter(2, cut_hz, fs=SR, output="sos"), x)
    return low + share * (x - low)


def rms_one(x):
    return x / np.sqrt(np.mean(x ** 2) + 1e-20)


def scene():
    sawing = chainsaw() + bites() + rasp() + loose_chain()
    return sawing + twigs() + rustle() + wind() + hum()


def roll_off(x):
    return signal.sosfilt(signal.butter(12, 16340, fs=SR, output="sos"), x)


def record(dry):
    passed = np.interp(np.fft.rfftfreq(N, 1 / SR), [15650, 15850], [1, 0])
    mix = irfft(rfft(dry) * passed)
    return roll_off(mix)


dry = scene()
out = record(dry)
waveform_to_disk(out)
```